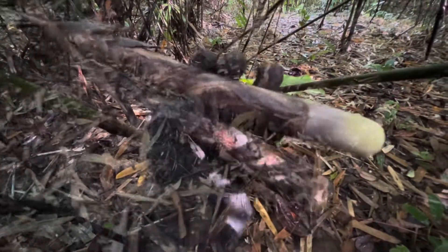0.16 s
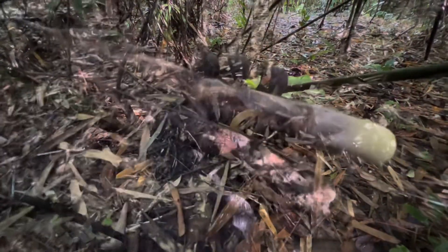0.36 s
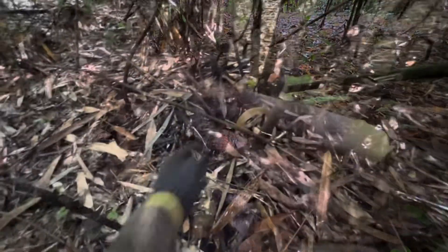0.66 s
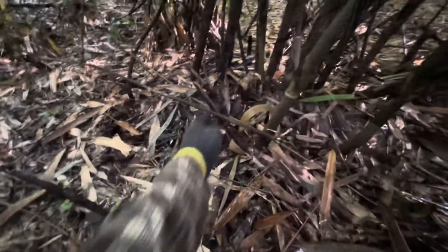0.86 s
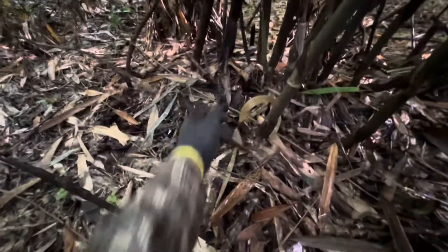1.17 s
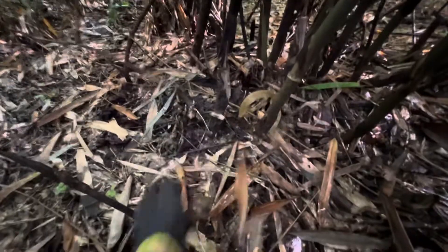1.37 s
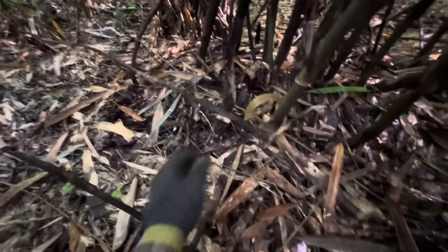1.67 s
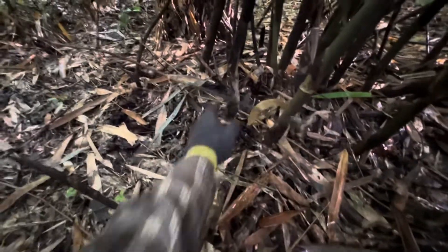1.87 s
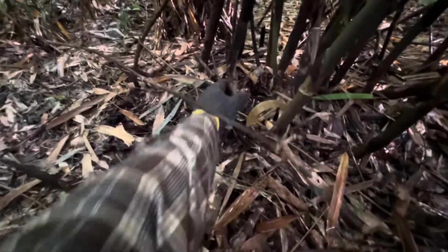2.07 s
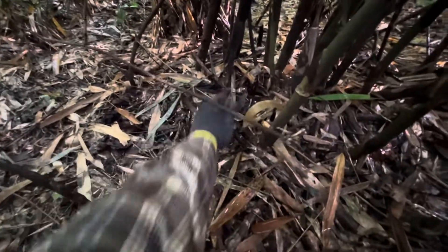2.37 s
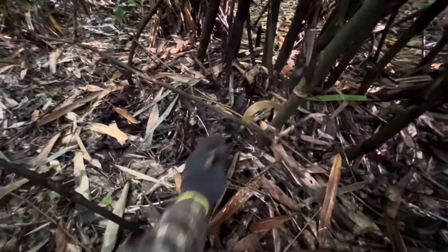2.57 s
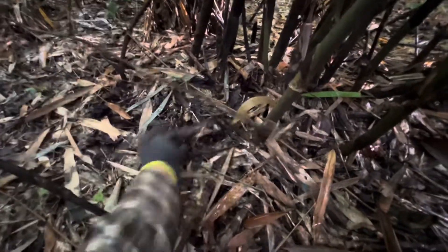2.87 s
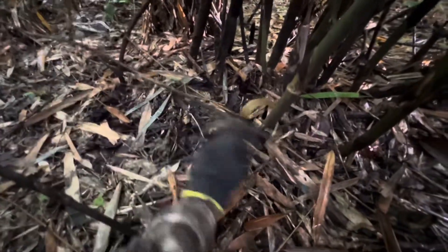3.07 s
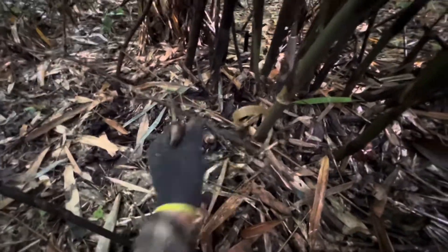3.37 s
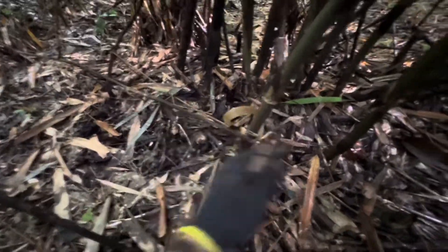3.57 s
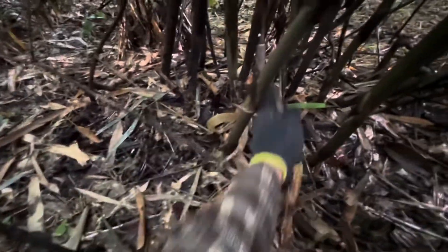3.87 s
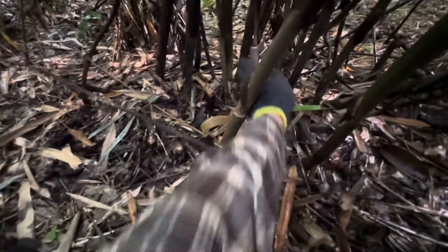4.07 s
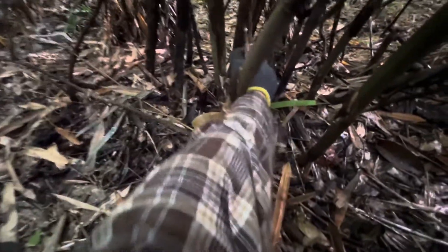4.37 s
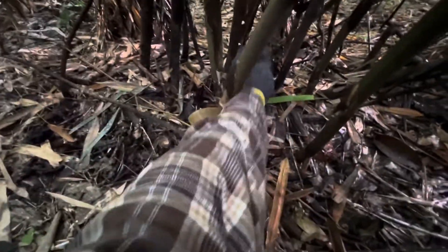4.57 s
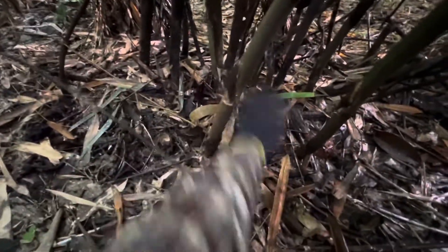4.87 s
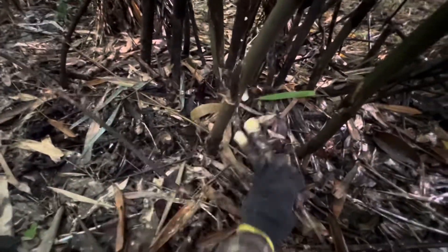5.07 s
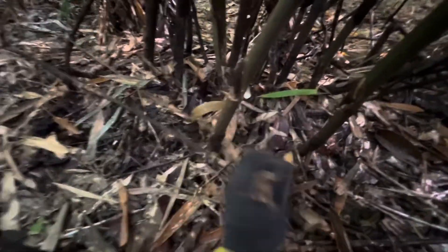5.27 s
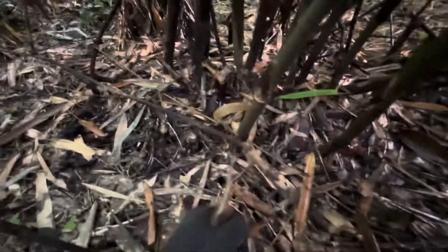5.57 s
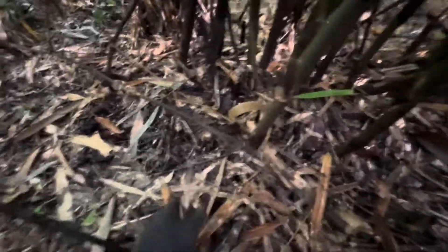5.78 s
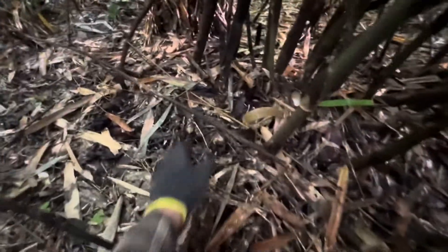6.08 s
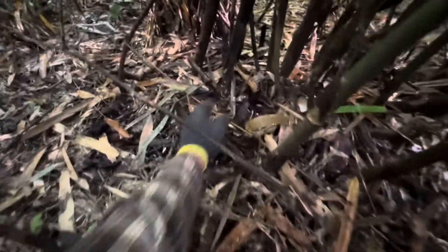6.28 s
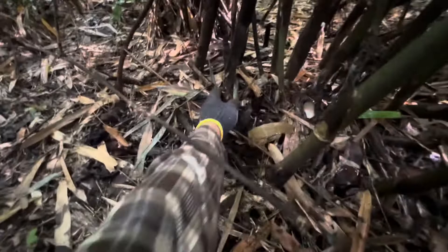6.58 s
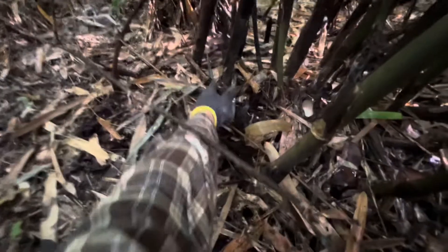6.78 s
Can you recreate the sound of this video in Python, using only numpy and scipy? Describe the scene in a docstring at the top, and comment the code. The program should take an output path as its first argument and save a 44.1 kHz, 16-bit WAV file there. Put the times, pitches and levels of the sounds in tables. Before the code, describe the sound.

Close up in a bamboo grove, a gloved hand rakes dry leaves and stiff sheaths, with sharp snaps and crunches in short bursts.

```python
"""Bamboo grove: a gloved hand rakes dry litter between the stems, an arm's length from a two-port camera.
Snaps are noise bursts ringing a sheath band; rustle is random grains in leaf, sheath and soil bands.
Scrapes ring one band, soil knocks are sagging sines; sleeve and breeze rumble as low shaped noise.
Far off, a dove coos and a small bird whistles (wobbling sines); insects are a faint band of noise."""
import sys
import numpy as np
from scipy import signal
from scipy.fft import rfft, irfft
from scipy.io import wavfile
from scipy.ndimage import uniform_filter1d

SR = 44100
rng = np.random.default_rng(int(sys.argv[2]) if len(sys.argv) > 2 else 0)


def dump_mix(stems):
    """Bounce the given channels to the path in sys.argv[1] as a 16-bit WAV at rate SR."""
    frames = np.atleast_2d(stems).T  # one column per channel
    limited = np.clip(frames, -1, 1)  # hard clip at full scale
    pcm = np.round(limited * 32767).astype(np.int16)
    wavfile.write(sys.argv[1], SR, pcm)


N = 305745


def undb(db):
    """Amplitude ratio of a level in dB."""
    return 10 ** (np.asarray(db) / 20)


def unit(x):
    """Scale to an RMS of 1 over all channels."""
    return x / np.sqrt(np.mean(x ** 2))


def curve(table):
    """Columns of a table (t/s first) interpolated at every sample."""
    s, *columns = np.transpose(table)
    t = np.arange(N) / SR
    return [np.interp(t, s, c) for c in columns]


def colour(x, table):
    """Shape the spectrum by (f/Hz, gain/dB) points with a short minimum-phase response."""
    hz, db = np.transpose(table)
    size = 2 ** 12
    bins_hz = np.fft.rfftfreq(size, 1 / SR)
    log_gain = np.log(undb(np.interp(np.log(bins_hz + 1), np.log(hz + 1), db)))
    # folding the cepstrum makes the response causal
    cepstrum = irfft(log_gain)
    cepstrum[1:size // 2] *= 2
    cepstrum[size // 2 + 1:] = 0
    response = irfft(np.exp(rfft(cepstrum)))[:size // 2]
    response = response.reshape((1,) * (x.ndim - 1) + (-1,))
    return signal.oaconvolve(x, response, axes=-1)[..., :x.shape[-1]]


def band(x, lo_hz, hi_hz, order=2):
    """Butterworth bandpass."""
    sos = signal.butter(order, [lo_hz, hi_hz], "bandpass", fs=SR, output="sos")
    return signal.sosfilt(sos, x)


def walk(rate_hz):
    """Random levels held 1 / rate_hz and slewed; spread near 1."""
    hold = int(SR / rate_hz)
    steps = np.repeat(rng.standard_normal(N // hold + 1), hold)
    return uniform_filter1d(steps, hold // 2)[:N]


def snaps():
    """Fibres part in a quick burst that rings the sheath for a few cycles and cracks in the treble."""
    # snaps: t/s, ring level/dB, ring f/Hz, crack gain re ring/dB (6 dB added below), left minus right/dB
    snap_rows = [(0.265, -44, 780, -8, 5), (0.646, -38, 1690, 0.5, 2), (0.662, -42, 1290, 2, 7),
                 (0.872, -28.5, 1350, -1.5, 3.5), (0.943, -26.5, 1460, 8, 0.5),
                 (1.149, -22.5, 2040, -2.5, -8.5), (1.179, -18, 2260, 6, 1.5), (1.185, -17, 2230, -48, -11),
                 (1.214, -32.5, 2200, 2, -3), (1.456, -34.5, 1390, 2, 4), (1.484, -33.5, 4440, 4, -1),
                 (1.497, -43, 4500, 6, 1), (1.518, -39, 780, -36, -1), (1.568, -52.5, 800, 2.5, 16),
                 (1.781, -40, 1430, -22, 1), (1.904, -42, 1960, 7.5, 6), (1.931, -44.5, 1390, -2, 3),
                 (1.969, -45, 2030, 4.5, 6), (2.3347, -1.5, 2680, -10.5, -1), (2.3561, -6, 2240, -10, -4),
                 (2.369, -22, 2220, -16, -6), (2.39, -9.5, 1920, -11.5, -6), (2.48, -21.5, 2250, 1, 0.5),
                 (2.5361, -31, 2130, 6, -6), (2.556, -21.5, 2140, -2, -1.5), (2.562, -19.5, 2440, 2, -5),
                 (2.589, -24.5, 2280, 2, 0), (2.612, -20.5, 1730, -16, -7), (2.621, -11, 1930, -3.5, -3.5),
                 (2.628, -28, 1770, -18, -8), (2.648, -15.5, 2540, 3, 2), (2.66, -22, 1840, 11.5, -3),
                 (2.722, -30.5, 2120, -1.5, -13.5), (2.794, -36, 1870, 13.5, 5.5),
                 (2.826, -32.5, 1700, -32, -12), (2.929, -16.5, 1460, 7.5, -9.5),
                 (2.933, -12, 1400, -0.5, -3.5), (3.168, -39.5, 2680, 4.5, -10), (3.335, -44, 960, -15, -3),
                 (3.452, -52, 4400, 12.5, 4), (3.497, -46.5, 2530, 2, -13), (3.783, -41, 3350, 3, 0),
                 (3.889, -48, 3650, 8, -1), (4.021, -41, 3120, -2, 0), (4.129, -8, 1340, 3.5, 0.5),
                 (4.286, -39.5, 2840, 9.5, -1), (4.342, -40, 583, 5.5, -2), (4.392, -32, 1970, 2, 3),
                 (4.41, -38, 2150, -1, 9), (4.482, -27.5, 1910, -1, -5), (4.531, -12, 1950, -10.5, -3),
                 (4.678, -7, 1730, -4.5, -2.5), (4.7485, -19, 2340, 2, -3), (4.762, -5, 1990, -59, -7.5),
                 (4.776, -4, 2090, -11, -2.5), (4.794, -21, 2480, -29, -5), (4.822, -24, 2170, -7, 2),
                 (4.844, -30, 1070, 1.5, -7), (4.882, -36, 1990, -20, -5.5), (4.935, -31.5, 620, 3, -10),
                 (5.3455, -40, 3500, 13, -7), (5.508, -45, 4490, 8, -21), (5.517, -32.5, 2840, -19, 3),
                 (5.581, -32.5, 730, -16, 0), (5.759, -30, 1160, -22, -4), (5.778, -35, 3320, -2, -8),
                 (5.883, -33, 1940, 3, 3), (5.897, -23, 4000, -22, 3), (5.938, -38, 1390, -18, 23),
                 (5.9582, -15.5, 4040, 12.5, -5.5), (5.96, -25, 1480, -22, 8),
                 (6.158, -38.5, 1050, 2.5, -8), (6.247, -50, 991, 9, -20), (6.305, -41, 1030, 2, -15),
                 (6.373, -37, 4550, 2.5, -13), (6.829, -53, 4630, 9.5, -11)]
    out = np.zeros((2, N + SR))
    t = np.arange(SR // 20) / SR
    noise = rng.standard_normal((len(snap_rows), 3, len(t)))
    lags = rng.integers(-3, 8, len(snap_rows))  # samples; right port late if positive
    tear_s = .0009
    tearing = (t / tear_s * np.exp(1 - t / tear_s)) ** 2
    fall = np.exp(-t / .003) * (1 - np.exp(-t / .001))
    parting = 16 * (np.arange(len(t)) == int(tear_s * SR))  # the last fibre goes all at once
    for (s, db, hz, crack_db, pan_db), (both, left, right), lag in zip(snap_rows, noise, lags):
        ring = band(both * tearing + parting, 0.7 * hz, 1.273 * hz)
        ring = ring / np.abs(ring).max()
        for c, own in enumerate((left, right)):
            scatter = 0.62 * both + 0.23 * own  # echoes off the stems differ at each port
            echoes = 1.03 * fall * band(scatter, 0.26 * hz, 1.4 * hz) * np.sqrt(6000 / hz)
            crack = band(scatter, 4920, 9450) * (tearing + .5 * fall)
            gain = undb(db + (1 - 2 * c) * pan_db / 2)
            i = int(s * SR) + max(lag if c else -lag, 0)
            out[c, i:i + len(t)] += gain * (ring + echoes + undb(crack_db + 6.0) * crack)
    return out[:, :N]


def grains(rate_hz, spread_db, tail_s, alike):
    """Tiny cracks of very uneven size, each smeared by a short tail; partly the same at both ports."""
    busy = undb(3.1 * walk(30))
    cracks = rng.random(N) < rate_hz * busy / SR
    size = np.zeros(N)
    size[cracks] = undb(spread_db * np.minimum(rng.exponential(size=cracks.sum()), 4.5))
    pole = [1, -np.exp(-2 / (tail_s * SR))]
    power = signal.lfilter([1], pole, uniform_filter1d(size ** 2, size=41))
    envelope = np.sqrt(power + 0.2)  # 0.2: hiss floor between cracks
    both, left, right = rng.standard_normal((3, N))
    return envelope * (np.sqrt(alike) * both + np.sqrt(1 - alike) * np.array([left, right]))


def pieces(lo_hz, hi_hz, count, rate_hz, cycles, alike):
    """Bits of litter of different size, each crackling in its own narrow band and stirred by turns."""
    total = 0
    for hz in np.geomspace(lo_hz, hi_hz, count):
        crackle = band(grains(rate_hz, 3., cycles / hz, alike), .9 * hz, 1.1 * hz)
        total = total + unit(crackle) * np.sqrt(hz) * undb(4 * walk(14))
    return unit(total)


def swells(table, rise_db, fall_db):
    """Gain of each level column: rows climb to a peak and die away; overlapping rows add in power.

    rise_db, fall_db: level lost one length before and after the peak."""
    t = np.arange(0, N / SR, .001)
    power = 0
    for s, length_s, *db in table:
        late = (t - s) / length_s
        shape = undb(np.where(late < 0, rise_db * late, -fall_db * late))
        power = power + np.outer(undb(db), shape) ** 2
    return np.array(curve(np.column_stack([t, np.sqrt(power).T])))


def rake():
    """Leaves, sheaths and soil share the hand's jerks; each has grains of its own as well."""
    # litter spectrum: f/Hz, gain/dB
    litter_spectrum = [(88, -43), (150, -5.5), (444, -9), (728, -9.5), (1040, -2.5), (1270, -3),
                       (4840, -8.5), (6770, -4.5), (8760, -5), (12500, -17), (13800, -30), (15500, -8),
                       (16800, -56)]
    # litter stirring and settling: t/s, papery leaves level/dB, stiff sheaths level/dB, glove on soil level/dB
    stir_levels = [(0.0, -69.5, -69, -70.5), (0.14, -78, -78, -72), (0.56, -66, -68.5, -63),
                   (0.8, -61.5, -63.5, -58), (1.3, -58, -60, -65.5), (1.68, -70, -72, -75.5),
                   (1.85, -67, -65, -64.5), (2.05, -59, -63, -66.5), (2.3, -61, -78.5, -68),
                   (3.0, -50, -55, -62.5), (3.5, -59, -64, -68.5), (3.78, -57.5, -67, -62.5),
                   (4.09, -57.5, -58, -72), (4.25, -51.5, -57, -58), (4.65, -66.5, -60.5, -65.5),
                   (4.86, -45, -53, -57), (5.29, -53, -60.5, -59), (5.66, -46, -56, -57),
                   (5.92, -40.5, -49, -47.5), (6.1, -54.5, -59.5, -54.5), (6.62, -58.5, -70.5, -80.5),
                   (6.93, -61, -63.5, -69.5)]
    # hand closes or pushes: peak t/s, length/s, leaves level/dB, sheaths level/dB, soil level/dB
    crunch_rows = [(0.95, 0.16, -47, -51.5, -50), (1.17, 0.087, -36, -39.5, -56.5),
                   (1.47, 0.2, -49, -55, -51), (2.341, 0.046, -31, -46.5, -48.5),
                   (2.42, 0.2, -41.5, -40, -42.5), (2.51, 0.27, -40, -49, -63.5),
                   (2.64, 0.1, -32.5, -41.5, -59), (2.72, 0.026, -29.5, -48, -77),
                   (2.86, 0.062, -54, -33, -77), (2.94, 0.058, -33, -37, -68),
                   (3.25, 0.13, -45.5, -72, -82), (4.135, 0.038, -21.5, -25.5, -25.5),
                   (4.19, 0.046, -36, -42.5, -35.5), (4.35, 0.055, -61, -50, -53),
                   (4.43, 0.34, -45, -54.5, -58), (4.52, 0.077, -40.5, -51, -45),
                   (4.684, 0.1, -44, -51, -61), (4.77, 0.077, -36, -33, -45.5),
                   (5.05, 0.068, -43, -44, -34.5), (5.18, 0.097, -45.5, -47.5, -54),
                   (5.39, 0.18, -32.5, -40, -51), (5.59, 0.044, -40.5, -47, -50),
                   (5.97, 0.033, -32.5, -42, -41), (6.26, 0.55, -50.5, -56, -58.5)]
    jerks = grains(200, spread_db=3.6, tail_s=.002, alike=.35)
    leaves = pieces(3150, 10250, count=6, rate_hz=120, cycles=70, alike=0.26)
    sheaths = pieces(907, 3430, count=6, rate_hz=45, cycles=50, alike=0.1)
    soil = pieces(250, 800, count=4, rate_hz=40, cycles=4, alike=0.6)
    edges_hz = (3500, 17000), (900, 3500), (200, 900)
    own_shares = .7, 1.0, .5
    crunches = swells(crunch_rows, rise_db=47, fall_db=22)
    gains = np.hypot(undb(curve(stir_levels)), crunches)
    total = 0
    for own, share, edges, gain in zip((leaves, sheaths, soil), own_shares, edges_hz, gains):
        mix = unit(band(jerks, *edges)) + share * own
        rustle = band(colour(mix, litter_spectrum), *edges, order=3)
        total = total + gain * unit(rustle)
    return total


def hollow(x):
    """In the lulls, thin the rustle below a moving edge, deepest just under it."""
    # t/s, upper edge of the hollow f/Hz
    edge_track = [(3.45, 101), (3.6, 1720), (3.9, 3360), (4.11, 1900), (4.13, 101), (6.28, 97), (6.4, 1956),
                  (6.7, 3470), (6.93, 1890)]
    depth_db = -14
    hz, t, frames = signal.stft(x, SR, nperseg=1024)
    share = hz[:, None] / np.interp(t, *np.transpose(edge_track))
    return signal.istft(frames * undb(depth_db * share * (share < 1)), SR)[1][:, :N]


def scrapes():
    """A sheath chatters along a stem: uneven slips in quick succession ring one resonance."""
    # t/s, length/s, ring f/Hz, level/dB
    scrape_rows = [(0.968, 0.16, 1400, -53), (1.201, 0.056, 2220, -49), (2.014, 0.072, 2750, -56),
                   (2.858, 0.022, 1650, -29), (4.459, 0.055, 2900, -43), (5.032, 0.13, 2090, -52),
                   (5.033, 0.073, 4400, -49), (5.429, 0.04, 2830, -45)]
    t = np.arange(N) / SR
    slips = grains(350, spread_db=3.5, tail_s=0.0019, alike=0.35)
    total = 0
    for s, length_s, hz, db in scrape_rows:
        arch = np.sin(np.pi * np.clip((t - s) / length_s, 0, 1)).clip(0)
        ring = unit(band(slips, 0.84 * hz, 1.12 * hz))
        total = total + undb(db) * np.sqrt(arch) * ring
    return total


def thuds():
    """The hand or a stem knocks the soil: a few dull cycles that sag in pitch."""
    # t/s, level/dB, settled f/Hz
    thud_rows = [(1.597, -41, 103), (2.407, -43.5, 82), (2.927, -40.5, 357), (4.132, -25, 135.6),
                 (4.894, -39, 217), (5.96, -29.5, 115)]
    out = np.zeros(N + SR)
    t = np.arange(SR // 10) / SR
    warped_t = t + .006 * (1 - np.exp(-t / 0.0028))
    for s, db, hz in thud_rows:
        knock = np.sin(2 * np.pi * hz * warped_t) * np.exp(-t * hz / 2.6)
        i = int(s * SR)
        out[i:i + len(t)] += undb(db) * knock
    return out[:N]


def rumble():
    """Distant low drone reaches both ports alike; puffs of air push one port and pull the other."""
    # low noise spectrum: f/Hz, gain/dB
    breeze_spectrum = [(20, -26), (38, -27.5), (55, 3.5), (75, -9.5), (120, -6.5), (190, -12), (300, -28.5),
                       (500, -54.5)]
    # slow rumble whose lows drop out around 2.0, 3.9 and 6.6 s:
    # t/s, level above 90 Hz/dB, level below 90 Hz/dB
    drone_levels = [(0.0, -57, -54.5), (0.61, -62, -56.5), (1.02, -57.5, -57.5), (1.33, -58, -54),
                    (1.81, -59, -52), (1.95, -71, -99), (2.31, -75, -100), (2.36, -63.5, -65.5),
                    (3.18, -59, -60.5), (3.3, -65.5, -69), (3.78, -72, -83), (3.92, -91.5, -76),
                    (4.2, -61, -57), (5.6, -57.5, -58.5), (6.04, -64, -53), (6.22, -66.5, -65),
                    (6.36, -87, -115), (6.62, -102.5, -120), (6.74, -82, -60), (6.93, -77, -63)]
    # sleeve brushes the case: peak t/s, length/s, level alike at both ports/dB, opposite/dB (before port gains)
    brush_rows = [(1.61, 0.12, -51, -35.5), (4.137, 0.032, -50, -48), (4.79, 0.043, -43, -59),
                  (4.91, 0.04, -45.5, -51), (5.06, 0.072, -40, -43), (5.69, 0.072, -41.5, -40),
                  (5.79, 0.029, -36, -28), (5.98, 0.017, -35, -43)]
    air_db = -11  # moving air re the deep drone, before port gains
    upper_db, deep_db = curve(drone_levels)
    alike, opposite = swells(brush_rows, rise_db=25, fall_db=16.5)
    gusty_noise = rng.standard_normal((2, N)) * undb(2.1 * walk(10))
    drone, puffs = colour(gusty_noise, breeze_spectrum)
    puffs = unit(puffs + .5 * drone) * np.hypot(undb(deep_db + air_db), opposite)
    hum = unit(band(drone, 54.6, 62))
    deep = band(unit(drone) + 0.26 * hum, 33, 78, order=3) * np.hypot(undb(deep_db), alike)
    upper = band(unit(drone), 90, 920, order=3) * np.hypot(undb(upper_db), alike)
    return deep + upper + puffs * np.array([[1.25], [-.8]])


def bird(table, throb, wobble):
    """A near sine with a restless pitch that sags where the note throbs down; silent outside its note."""
    hz, db = curve(table)[:2]
    t = np.arange(N) / SR
    sounding = (t > table[0][0]) & (t < table[-1][0])
    sag = 1 - .1 * np.clip(.6 - throb, 0, 1)
    phase = 2 * np.pi * np.cumsum(hz * sag * (1 + wobble * walk(450))) / SR
    return sounding * undb(db) * throb * np.sin(phase)


def birds():
    """The dove's coo throbs ever faster, then ends smooth; the small bird's notes are hoarse."""
    # coo: t/s, nominal f/Hz, level/dB before throbbing
    dove_note = [(.1, 600, -93), (.115, 626, -56), (.15, 772, -55), (.42, 710, -58), (.49, 663, -66),
                 (.52, 571, -64), (.565, 555, -63), (.585, 573, -80)]
    # one table a note: t/s, nominal f/Hz, level/dB before roughening
    whistle_notes = [
        [(1.6, 3150, -68), (1.615, 3180, -58), (1.71, 2980, -61), (1.76, 3170, -72)],
        [(1.73, 2120, -76), (1.775, 2720, -57), (1.83, 2660, -60), (1.89, 2790, -70), (1.96, 2570, -84)],
    ]
    throbs_per_s, throb_gain_per_s2, throb_depth, throb_ends_s = 28, 41, .9, 0.426
    t = np.arange(N) / SR
    rate_hz = throbs_per_s + throb_gain_per_s2 * np.maximum(t - dove_note[0][0], 0)
    depth = throb_depth * np.clip((throb_ends_s - t) / 0.028 + .5, 0, 1)
    throb = 1 - depth * np.cos(np.pi * np.cumsum(rate_hz) / SR + .4) ** 2
    hoarse = undb(3.5 * walk(200))
    coo = bird(dove_note, throb, wobble=.02)
    # a lower murmur fills the gaps
    murmur_note = [(s, .8 * hz, db - 8) for s, hz, db in dove_note]
    murmur = bird(murmur_note, 1 - throb, wobble=.03)
    whistle = sum(bird(note, hoarse, wobble=.028) for note in whistle_notes)
    return coo + murmur + whistle


def insects():
    """A narrow noise band, unrelated at the two ports, whose level comes and goes at both together."""
    centre_hz, half_width_hz, middle_db = 7460, 220, -74
    song = band(rng.standard_normal((2, N)), centre_hz - half_width_hz, centre_hz + half_width_hz)
    return unit(song) * undb(middle_db + 6 * walk(9))


def scene():
    """Near sounds, shaded by the case and ringing each port's cavity, plus rumble, birds and insects."""
    # port response: f/Hz, left gain/dB, right gain/dB
    port_gains = [(299.4, -2, -1.5), (1100, -1.5, -1), (2370, -0.5, 4.5), (4400, 2.5, 0), (7150, -2, -12),
                  (8810, -4.5, 4.5), (10330, -6.5, -3.5), (12380, 1.5, 2.5), (15600, -1, -0.5)]
    near = snaps() + hollow(rake()) + scrapes() + thuds()
    hz, left_db, right_db = np.transpose(port_gains)
    left = colour(near[0], np.transpose([hz, left_db]))
    right = colour(near[1], np.transpose([hz, right_db]))
    return np.array([left, right]) + rumble() + birds() + insects()


def record(dry):
    """The loudest peaks are rounded softly; the camera cuts the top."""
    top_hz = 16500
    rounded = .85 * np.tanh(dry / .85)
    return signal.sosfilt(signal.ellip(12, .2, 95, top_hz, fs=SR, output="sos"), rounded)


dry = scene()
out = record(dry)
dump_mix(out)
```